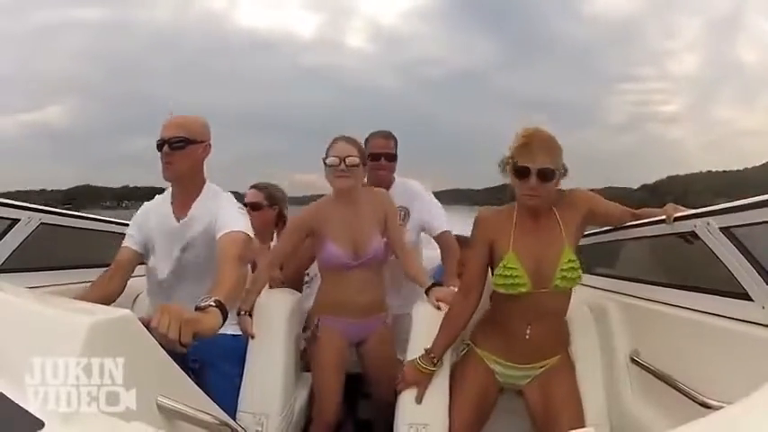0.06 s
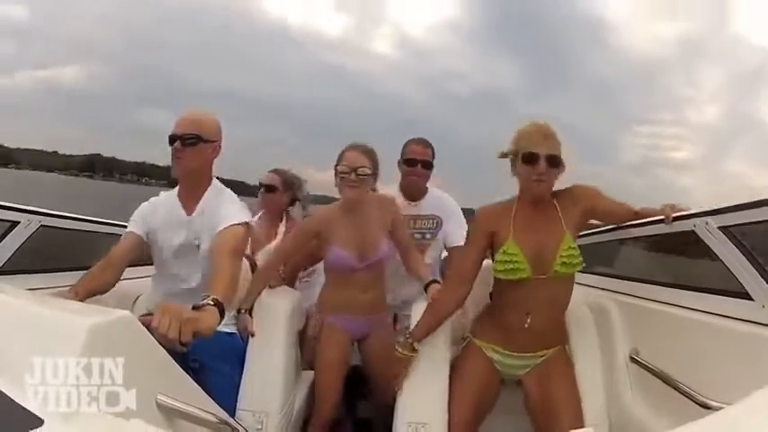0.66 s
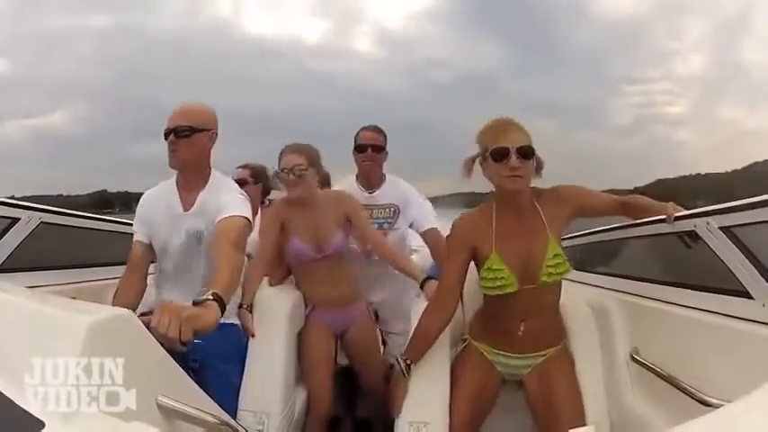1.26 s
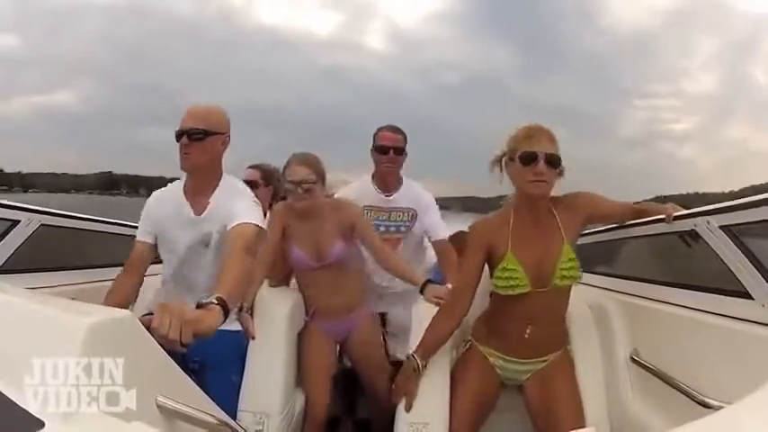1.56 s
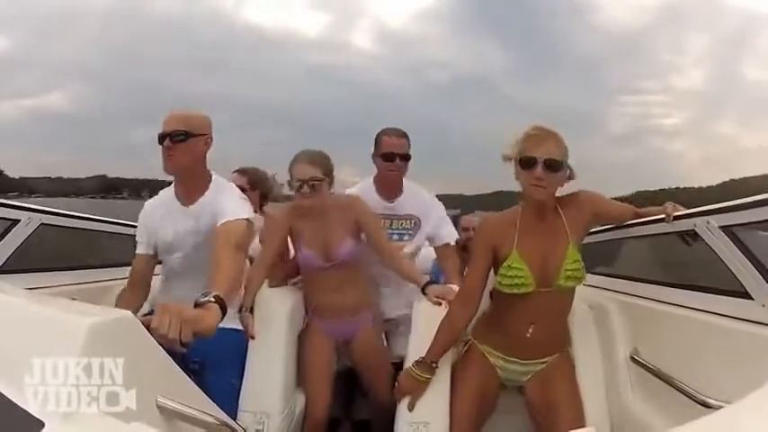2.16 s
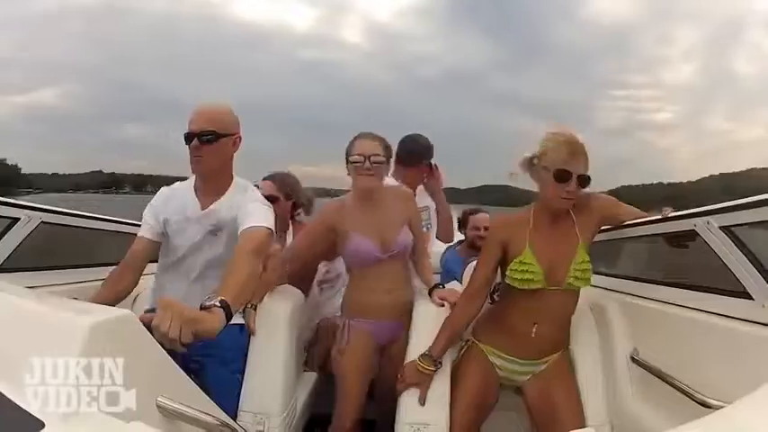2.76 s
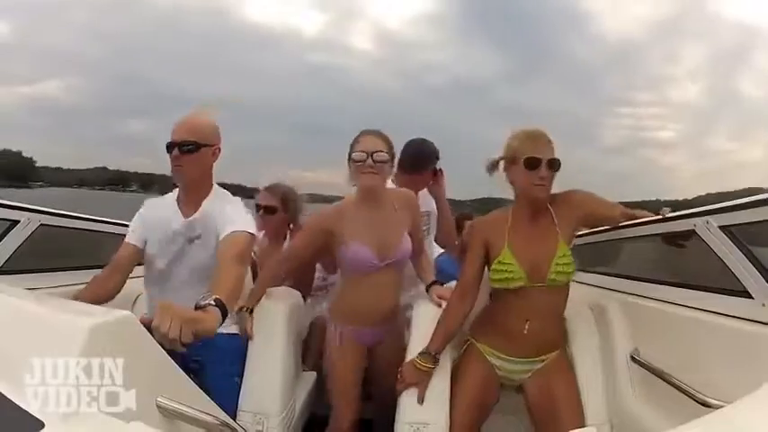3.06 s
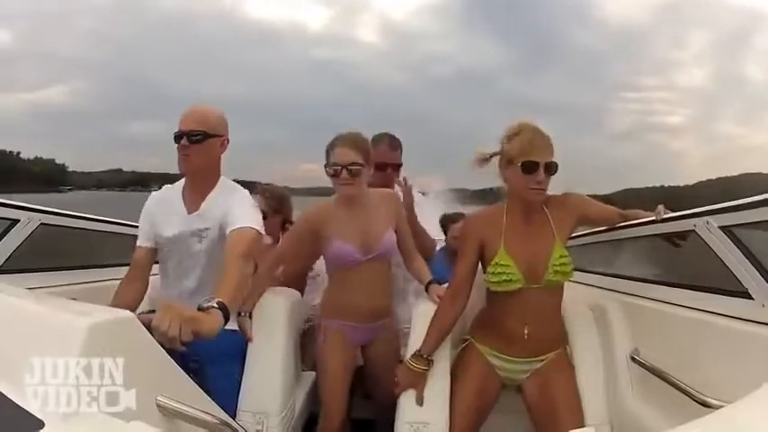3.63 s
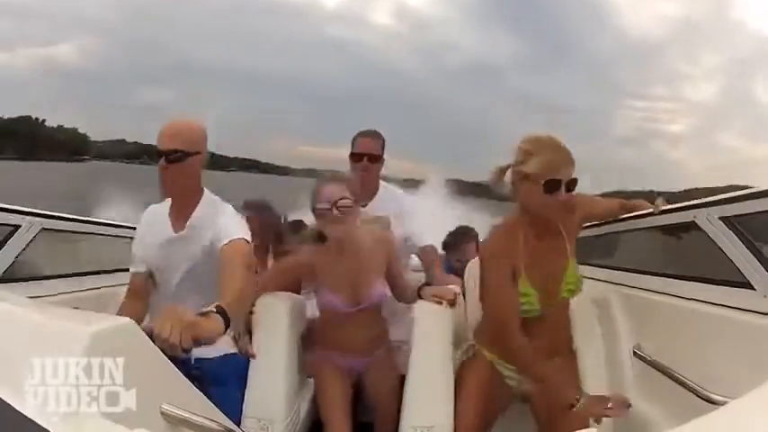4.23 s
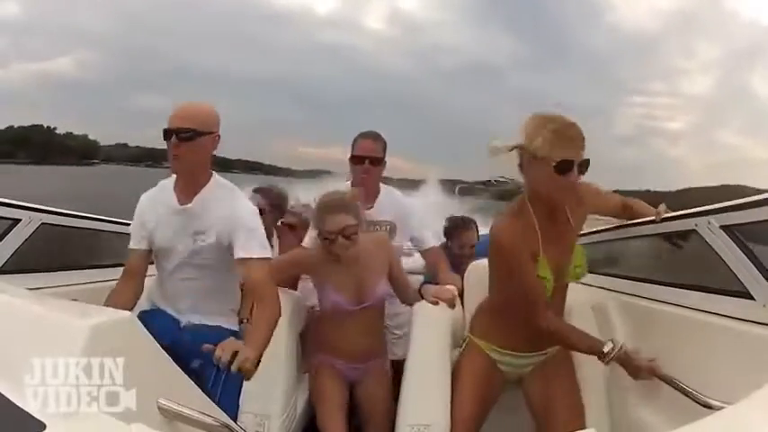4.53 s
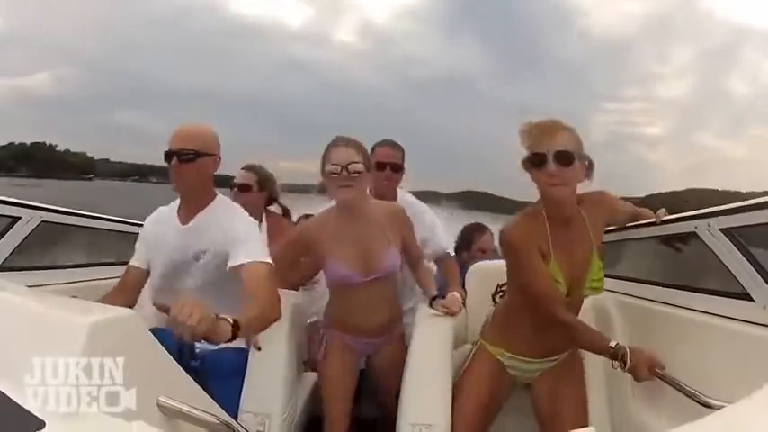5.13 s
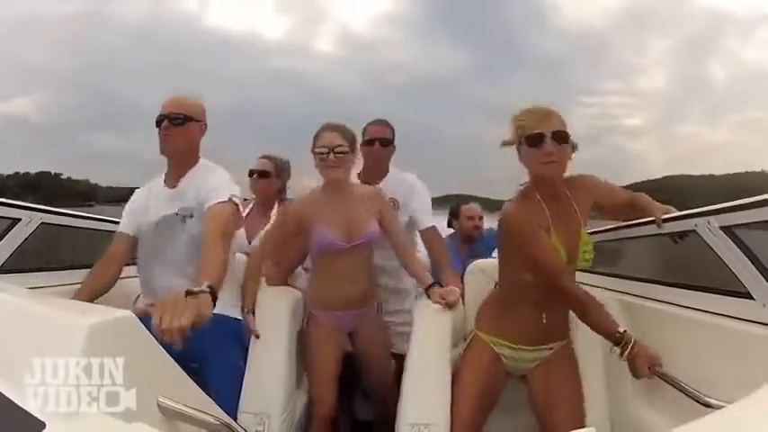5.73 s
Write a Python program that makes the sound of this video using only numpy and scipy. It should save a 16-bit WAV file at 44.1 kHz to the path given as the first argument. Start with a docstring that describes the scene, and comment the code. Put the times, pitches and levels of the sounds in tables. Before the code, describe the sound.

Wind rumbles on the microphone as a motorboat runs fast over choppy water, its engine droning while loose parts tick and knock.

```python
"""Speedboat flat out over chop

Heard from a small camera on the dashboard: the exhaust drones under buffeting wind and the rush of
the wake. Waves thump the hull, the shaking mount ticks, fittings chatter and a loose panel buzzes;
hard slams knock the housing. The recorder overloads and holds its samples at a low rate,
which adds a thin whistle on top."""
import sys
import numpy as np
from scipy import signal
from scipy.fft import rfft, irfft
from scipy.io import wavfile
from scipy.ndimage import uniform_filter1d

SR = 44100
rng = np.random.default_rng(int(sys.argv[2]) if len(sys.argv) > 2 else 0)


def dump(signal):
    """Clip the signal to [-1, 1] and save it as 16-bit WAV at the path in sys.argv[1]."""
    limited = np.clip(np.atleast_2d(signal).T, -1, 1)
    pcm = np.round(limited * 32767).astype(np.int16)
    wavfile.write(sys.argv[1], SR, pcm)


N = 255339
TIME = np.arange(N) / SR
SWAY_HZ = 20  # the camera swings on its mount at this rate

# how hard the fittings chatter: time_s, level_db
CHATTER_CURVE = [(0, -37.5), (.3, -49.5), (.63, -35.5), (1.11, -40), (1.35, -44), (1.47, -38), (2.02, -38),
                 (2.3, -46), (2.62, -36), (2.78, -46), (3.3, -35), (3.7, -47), (4.15, -37), (4.62, -41),
                 (4.95, -35.5), (5.5, -46), (5.79, -32)]


def engine(firing_db=-3.5, overtones_db=-15, wander=0.004, roughness=0.21, throb_db=0.42):
    """Exhaust and propeller tones lock to one crankshaft; the airstream makes each one flutter."""
    # crankshaft speed: time_s, speed_hz
    crank_speed = [(0, 42.85), (.5, 43.29), (1.2, 43.78), (1.7, 44.13), (2.3, 43.81), (2.8, 43.66),
                   (3.3, 43.81), (3.9, 43.41), (4.7, 43.14), (5.2, 42.89), (5.79, 42.66)]
    # swell of the exhaust's firing tone: time_s, level_db
    firing_curve = [(0, -11), (0.28, -5.5), (0.65, -7.5), (1.22, -14.5), (1.34, -3.5), (1.46, -13.5),
                    (1.62, -5), (1.85, -9.5), (2.14, -14), (2.32, -2.5), (2.6, -12.5), (3.1, -10.5),
                    (3.38, -9.5), (3.9, -8.5), (4.25, -13.5), (4.85, -10.0), (5.1, -10.5), (5.79, -8.5)]
    # engine and propeller tones, the loudest being the firing tone: crank_multiple, level_db
    tones = [(1.5, -15.5), (2, -13), (2.5, -10), (3, 1), (4, -16.5), (5, -13), (5.32, -12), (6, -21),
             (7, -19.5), (8, -18.5), (9, -28.5), (10, -27), (11, -24.5), (12, -28.5), (14, -39.5)]
    turns = np.cumsum(follow(crank_speed) * (1 + wander * drift(7.3))) / SR
    level_db = follow(firing_curve) + lulls() + throb_db * drift(18.7)
    firing = gain_of(firing_db + level_db)
    overtones = gain_of(overtones_db + 0.5 * (level_db - level_db.mean()))  # swell half as far
    loudest = max(db for _, db in tones)
    out = np.zeros(N)
    for multiple, db in tones:
        flutter = 1 + roughness * (drift(17.6) + 1j * drift(35.5))  # in level and in phase
        tone = (flutter * np.exp(2j * np.pi * (multiple * turns + rng.random()))).real
        out += np.sqrt(2) * gain_of(db) * tone * (firing if db == loudest else overtones)
    return out


def wind(sway_db=-25, unrest_db=1.34):
    """Low turbulence buffets the camera, steadily and in gusts; the swaying mount adds a sub tone."""
    # rumble of the turbulence: freq_hz, level_db
    rumble_spectrum = [(8, -26), (20, -12), (30, -17.5), (48, -5), (65, 2), (80, -0.5), (100, 5), (120, 2),
                       (150, -5.5), (185, -18), (260, -37), (450, -55.5)]
    # the wind between gusts: time_s, level_db
    airstream_curve = [(0, -13), (.45, -17.5), (.85, -10), (1.3, -16), (1.9, -12), (2.3, -16.5),
                       (2.7, -12.5), (4.1, -11.5), (4.45, -14), (5.79, -12)]
    eddies = steady_noise(rumble_spectrum)
    sway = np.sin(2 * np.pi * np.cumsum(SWAY_HZ * (1 + 0.054 * drift(7.2))) / SR)
    airstream = gain_of(follow(airstream_curve) + unrest_db * drift(24) + 0.49 * lulls())
    return np.hypot(airstream, gusts()) * eddies + gain_of(sway_db) * sway


def gusts(half_length_s=0.031):
    """Short gusts hit the camera: a gain envelope in which overlaps add in power."""
    # gust hits: centre_s, peak_db
    hits = [(0.081, -6), (.28, -11), (.74, -9), (.84, -7), (0.921, -6.5), (1.12, -9), (1.29, -9.5),
            (1.48, -4), (1.819, -1.5), (1.98, -3), (2.12, -12), (2.51, -3), (2.65, -3.5), (3.05, -9),
            (3.29, -8), (3.44, -5), (3.72, -6), (4.21, -5), (4.32, -8), (4.61, -4), (4.84, -5),
            (5.042, -2.5), (5.14, -9.5), (5.53, -10), (5.73, -6)]
    return np.sqrt(sum((gain_of(db) * swell(s, half_length_s)) ** 2 for s, db in hits))


def water_rush(hull_db=-5, wake_db=-4, lumps_db=2.0, chop_db=1.14):
    """Water drums on the hull and hisses off in the wake, both surging with the same chop."""
    # drumming of the hull: freq_hz, level_db
    hull_spectrum = [(110, -8), (170, 2), (230, 8), (290, 1), (380, -4), (480, -9.5), (620, -22.5),
                     (1000, -59.5)]
    # how hard the hull presses on the water: time_s, level_db
    hull_load = [(0, -14.5), (0.3, -17), (0.6, -10.5), (0.94, -12.5), (1.15, -15.5), (1.3, -9.5),
                 (1.62, -16.5), (2.15, -18), (2.47, -11), (2.8, -13), (3.07, -6.5), (3.55, -14.5),
                 (3.72, -11), (4.17, -9), (4.4, -18.5), (5.02, -10), (5.3, -22), (5.79, -11.5)]
    # rush of the wake: freq_hz, level_db
    wake_spectrum = [(250, -17.5), (500, 1.5), (630, -2.5), (800, -5.5), (1000, -0.5), (1250, -8.5),
                     (1500, -18), (2200, -13.5), (5500, -67)]
    # swell of the wake: time_s, level_db
    wake_curve = [(0, -30), (0.3, -29.0), (0.48, -25), (0.92, -26.5), (1.15, -29), (1.33, -25),
                  (1.75, -30.5), (2.15, -30), (2.48, -25), (2.8, -28.5), (3.03, -24.5), (3.6, -27.5),
                  (3.9, -25.5), (4.4, -27.5), (4.7, -33), (4.87, -24), (5.3, -31), (5.79, -28)]
    drumming = gain_of(hull_db + follow(hull_load)) * steady_noise(hull_spectrum)
    wake = gain_of(wake_db + follow(wake_curve)) * steady_noise(wake_spectrum)
    surge_db = lumps_db * drift(69) + chop_db * drift(10.5) + 0.97 * lulls()
    return gain_of(surge_db) * (drumming + wake)


def wave_thumps(level_db=-3):
    """Each wave gives the hull a short, dull push."""
    # waves meeting the hull: start_s, level_db, length_s
    waves = [(0.066, 0, 0.026), (0.829, 3.5, 0.018), (0.909, -6, 0.013), (.932, 8, 0.018),
             (1.975, -2.5, 0.029), (2.606, -1, 0.026), (3.06, -6, 0.044), (3.39, -2, 0.028),
             (3.764, -17, 0.019), (4.197, -1.5, 0.029), (4.352, -1.5, 0.011), (4.874, 3.5, 0.018),
             (5.024, 1.5, 0.019), (5.126, -10, 0.017)]
    # body of a thump: freq_hz, level_db
    thump_spectrum = [(70, 2.5), (180, 16.5), (300, -15), (500, -1), (750, -14), (1100, -36), (1700, -22),
                      (3000, -30.5)]
    water = coloured(rng.standard_normal(N), thump_spectrum)
    out = np.zeros(N)
    for start, db, length in waves:
        push = water[round(start * SR):][:round(length * SR)]
        push = push * signal.windows.tukey(len(push), 0.7)
        add(out, start, gain_of(db + level_db) * push / abs(push).max())
    return out


def housing_knocks(scrape_s=0.00058):
    """The hull slams, and a blow with a gritty contact rings the housing."""
    # hard slams: start_s, peak_db
    slams = [(.074, -6.5), (2.618, -13), (4.215, -7), (4.313, -10.5), (4.351, -16), (4.358, -14),
             (4.383, -5.5), (4.387, -8), (4.411, -8), (4.414, -14), (4.437, -2), (4.4411, -11),
             (4.469, -16.5), (4.881, -18), (5.029, -8), (5.709, -19)]
    # modes of the housing: pitch_hz, level_db, t60_s
    modes = [(415.2, -20, .02), (980, -4, 0.019), (1340, 2, 0.004), (1850, -7.5, 0.01), (2130, -2, 0.013),
             (2800, -11, 0.0071), (3630, -18, 0.0092)]
    t = np.arange(1500) / SR
    ring = sum(gain_of(db - 60 * t / t60) * np.sin(2 * np.pi * hz * t) for hz, db, t60 in modes)
    out = np.zeros(N)
    for start, db in slams:
        blow = (t == 0) + np.exp(-t / scrape_s) * rng.standard_normal(len(t))
        knock = signal.fftconvolve(blow, ring)
        add(out, start, gain_of(db) * knock / abs(knock).max())
    return out


def add_tick(out, start, db, snap_s=0.00033, bounce_s=0.0024, rebound_db=-4):
    """Mixes in one dry snap and three uneven rebounds; each tick is a little brighter or duller."""
    # colour of the snap: freq_hz, level_db
    snap_spectrum = [(600, -17), (1500, -5), (2400, 5), (2900, 5.5), (3250, 0), (3650, 4), (4300, -7),
                     (4850, -3), (5400, -5), (6000, -10)]
    t = np.arange(1024) / SR - 0.002
    bounces = np.cumsum(bounce_s * (0.6 + 0.8 * rng.random(3)))
    tilt_db_per_octave = 2.5 * rng.standard_normal()
    colour = [(hz, level + tilt_db_per_octave * np.log2(hz)) for hz, level in snap_spectrum]
    decays = [(t >= at) * np.exp(-abs(t - at) / snap_s) for at in [0, *bounces]]
    snap, *later = [unit_rms(coloured(decay * rng.standard_normal(len(t)), colour)) for decay in decays]
    rebounds = unit_rms(sum(hit / (k + 1) for k, hit in enumerate(later)))
    rebounds *= gain_of(rebound_db + 2.4 * rng.standard_normal())
    snap_share = 0.0015 * SR / len(t)  # db sets the snap's energy as if it lasted 1.5 ms
    add(out, start + t[0], gain_of(db) * np.sqrt(snap_share) * (snap + rebounds))


def mount_ticks(uneven_db=0.46, strays=36, stray_db=9, stray_spread_db=5.0):
    """The mount hits its stop about once a swing; stray ticks follow the level of the chatter."""
    # runs of ticks that grow or fade: first_s, last_s, first_db, last_db
    runs = [(.047, .194, -24, -27), (.244, .296, -33, -30.5), (.437, 0.52, -26, -18.5),
            (.582, .582, -18, -18), (.632, .777, -25.5, -24), (.834, .93, -21, -27), (.918, 0.95, -16, -15),
            (.998, 1.157, -33, -26.5), (1.283, 1.45, -26, -26), (1.48, 1.7, -17.5, -25),
            (1.824, 1.824, -21, -18), (1.912, 2.01, -29, -33), (1.986, 2.183, -25, -25.5),
            (2.295, 2.295, -23.5, -28), (2.412, 2.64, -31.5, -32), (2.648, 2.72, -23.5, -29),
            (2.815, 2.878, -30, -27), (3.14, 3.44, -24, -18.5), (3.317, 3.46, -32, -28),
            (3.397, 3.397, -25, -22), (3.59, 3.643, -27.5, -23.5), (3.73, 3.82, -31, -31),
            (3.958, 4.059, -25.5, -18.5), (4.118, 4.16, -22.5, -18), (4.493, 4.41, -26, -33),
            (4.728, 4.8, -20, -15.5), (4.881, 5.057, -29.5, -20.5), (5.246, 5.246, -28, -9),
            (5.31, 5.41, -25, -26.5), (5.568, 5.711, -26.5, -12), (5.765, 5.765, -20, -19)]
    out = np.zeros(N)
    for first, last, first_db, last_db in runs:
        swings = round(abs(last - first) * SWAY_HZ) + 1
        for start, db in zip(np.linspace(first, last, swings), np.linspace(first_db, last_db, swings)):
            add_tick(out, start, db + uneven_db * rng.standard_normal())
    chatter_db = follow(CHATTER_CURVE) + lulls()
    for at in rng.integers(0, N, strays):
        add_tick(out, at / SR, chatter_db[at] + stray_db + stray_spread_db * rng.standard_normal())
    return out


def panel_buzzes(level_db=1, panel_hz=2200, width_hz=550):
    """Bursts of fine chatter ring one resonance of a loose panel."""
    # brief buzzes: start_s, level_db, length_s
    buzzes = [(.819, -27, .016), (1.144, -34.5, 0.015), (1.337, -28.5, 0.038), (2.426, -28, 0.015),
              (2.502, -27.5, 0.013), (2.614, -30, 0.018), (3.072, -25, .01), (3.097, -28, 0.015),
              (3.137, -31, 0.0074), (3.991, -35, .013), (4.123, -31, .01), (4.386, -31, .008),
              (4.435, -21, 0.0096), (4.586, -29, 0.013), (4.854, -30, .0074), (4.938, -30.5, .013),
              (5.014, -29, .012)]
    band = [panel_hz - width_hz / 2, panel_hz + width_hz / 2]
    ring = signal.sosfilt(signal.butter(2, band, "band", fs=SR, output="sos"), rng.standard_normal(N))
    out = np.zeros(N)
    for start, db, length in buzzes:
        burst = unit_rms(ring[round(start * SR):][:round(length * SR)])
        add(out, start, gain_of(db + level_db) * burst * signal.windows.tukey(len(burst), 0.8))
    return out


def fittings_chatter(shake, level_db=-3, clump_db=8.5, crackle_db=-2, clicks_per_s=150):
    """Fittings rattle in short clumps and tiny clicks, most in gusts and at the peaks of the shake."""
    # colour of the clumps: freq_hz, level_db
    clump_spectrum = [(700, -5), (1400, 2), (1750, 9.5), (2200, 13.5), (2600, 7), (3200, -12),
                      (3700, -35.5), (4300, -39), (4900, -21), (5500, -44), (6000, -32)]
    # colour of the clicks: freq_hz, level_db
    click_spectrum = [(800, -28), (1600, -17), (2400, 3.5), (3200, 0), (3700, 2), (4300, -11), (4900, 5),
                      (5600, -7.5)]
    contacts = rng.standard_normal(N) * gain_of(clump_db * np.minimum(drift(200), 2))
    clumps = unit_rms(coloured(contacts, clump_spectrum))
    click_sizes = (0.5 + np.minimum(rng.exponential(1, N), 2)) * rng.choice([-1, 1], N)
    clicks = click_sizes * (rng.random(N) < clicks_per_s / SR)
    crackle = gain_of(crackle_db) * unit_rms(coloured(clicks, click_spectrum))
    strain = np.minimum(abs(unit_rms(shake)), 2) - 1
    agitation_db = 0.25 * lulls() + 8 * gusts() + 3 * strain
    return gain_of(level_db + follow(CHATTER_CURVE) + agitation_db) * (clumps + crackle)


def lulls():
    """The whole roar ducks briefly: an envelope in dB, of which each layer takes its share."""
    # dips in the roar: centre_s, depth_db, half_length_s
    dips = [(0.18, -3.5, 0.024), (0.877, -7, 0.025), (1.041, -9.5, .045), (1.899, -8, 0.018),
            (2.556, -7, .02), (2.745, -5, 0.054), (3.519, -9, 0.034), (3.597, -10.5, .025),
            (4.268, -9, 0.021), (4.43, -6, 0.037), (4.76, -4, 0.024), (4.941, -12.5, 0.026),
            (5.23, -6.5, 0.049), (5.6, -10.5, 0.043)]
    return sum(db * swell(s, half_length) for s, db, half_length in dips)


def gain_of(db):
    """Decibels to gain."""
    return 10 ** (np.asarray(db) / 20)


def unit_rms(x):
    """Scales to an rms of one."""
    return x / np.sqrt(np.mean(x ** 2) + 1e-20)


def follow(curve):
    """Draws a (time_s, value) curve at every sample."""
    return np.interp(TIME, *np.transpose(curve))


def swell(centre_s, half_length_s):
    """A bell-shaped envelope of height one."""
    distance = (TIME - centre_s) / half_length_s
    near = abs(distance) < 3
    out = np.zeros(N)
    out[near] = np.exp(-distance[near] ** 2)
    return out


def drift(rate_hz):
    """A smooth random wobble of rms one that rolls off above rate_hz."""
    step, size = 16, 16384
    f = np.fft.rfftfreq(size, step / SR)
    coarse = irfft(rfft(rng.standard_normal(size)) * np.exp(-(f / rate_hz) ** 2), size)
    return unit_rms(np.interp(np.arange(N) / step, np.arange(size), coarse))


def coloured(x, spectrum):
    """Shapes x with a (freq_hz, level_db) EQ curve."""
    hz, db = np.transpose(spectrum)
    f = np.fft.rfftfreq(len(x), 1 / SR)
    eq_db = np.interp(np.log(f + 1), np.log(hz), db)
    return irfft(rfft(x) * gain_of(eq_db), len(x))


def steady_noise(spectrum, window=1800):
    """Coloured noise with its slow swells levelled out, ready for an envelope."""
    noise = coloured(rng.standard_normal(N), spectrum)
    power = uniform_filter1d(uniform_filter1d(noise ** 2, window), window)
    return noise / np.sqrt(abs(power) + 1e-12)


def low_passed(x, edge_hz, taps):
    """A steep low-pass."""
    return signal.oaconvolve(x, signal.firwin(taps, edge_hz, window=("kaiser", 9), fs=SR), "same")


def add(mix, start_s, sound):
    """Mixes a sound in at start_s."""
    part = mix[max(round(start_s * SR), 0):][:len(sound)]
    part += sound[:len(part)]


def scene():
    """Engine, wind and water shake the fittings; everything meets at one microphone."""
    shake = engine() + wind() + water_rush() + wave_thumps()
    return (shake + fittings_chatter(shake) + mount_ticks() + panel_buzzes() + housing_knocks())[None]


def record(dry, drive_db=0.4, band_hz=5920, hold_hz=12000, ceiling=0.95, top_hz=15500):
    """Peaks clip flat; holding each slow sample mirrors the sound around hold_hz as a thin whistle."""
    driven = low_passed(dry[0], band_hz, taps=255) * gain_of(drive_db)
    slow = signal.resample_poly(driven, hold_hz, SR)
    clipped = slow / (1 + (slow / ceiling) ** 16) ** (1 / 16)
    held = signal.resample_poly(np.repeat(clipped, 4), SR, 4 * hold_hz)[:N]
    return low_passed(held, top_hz, taps=141)[None]


dry = scene()
out = record(dry)
dump(out)
```